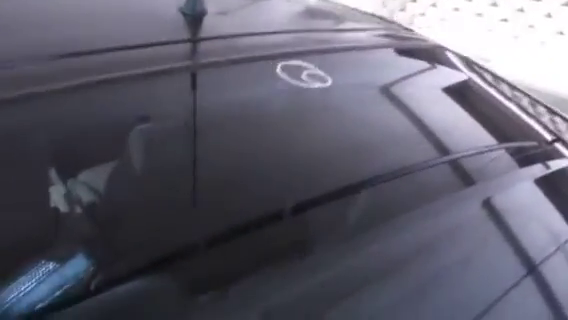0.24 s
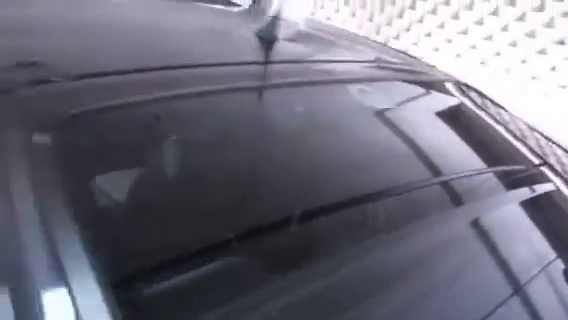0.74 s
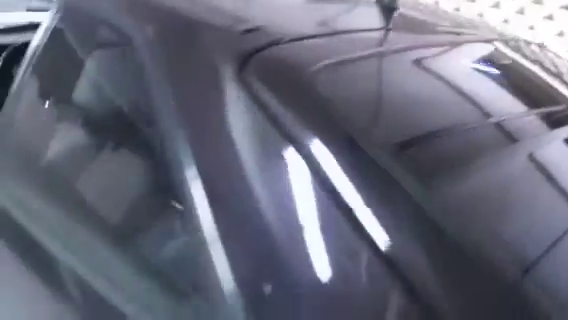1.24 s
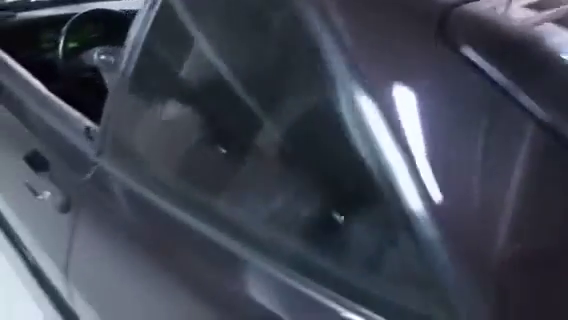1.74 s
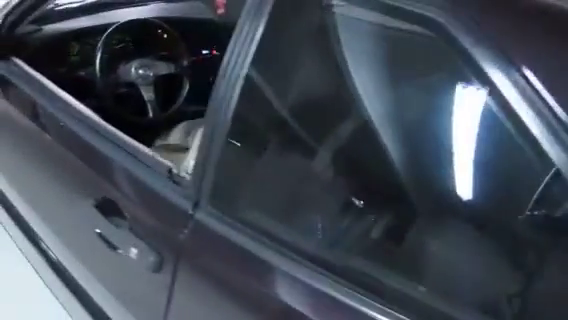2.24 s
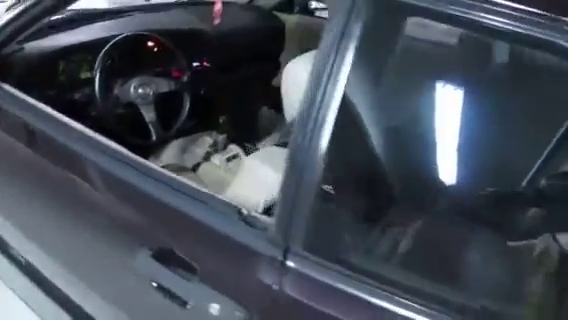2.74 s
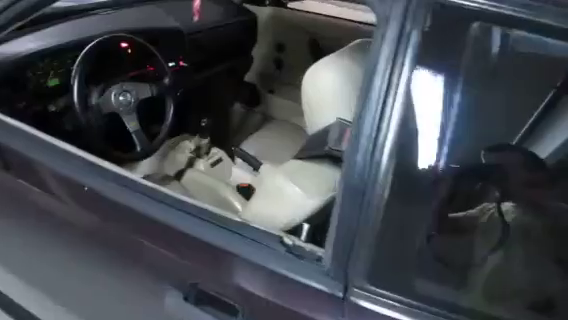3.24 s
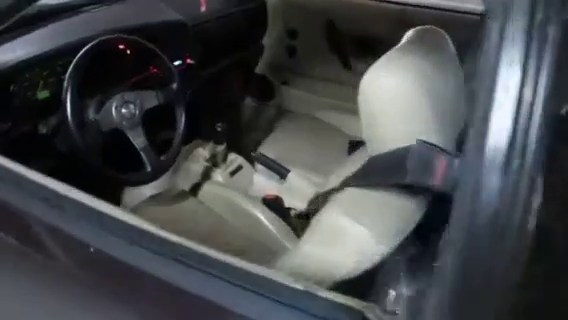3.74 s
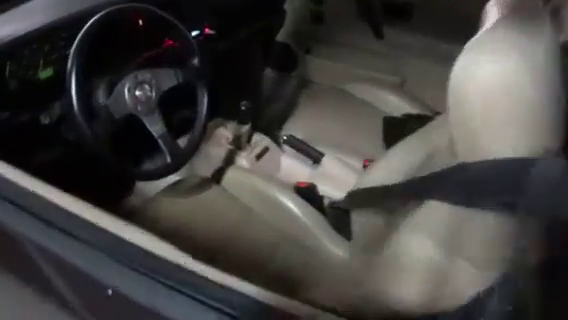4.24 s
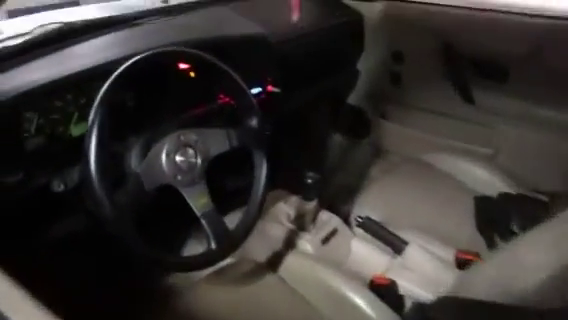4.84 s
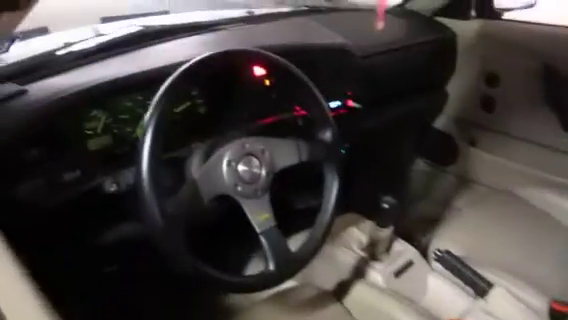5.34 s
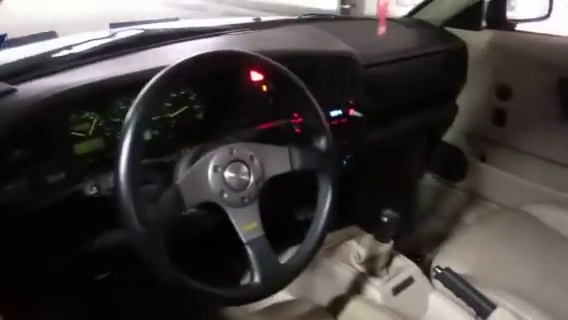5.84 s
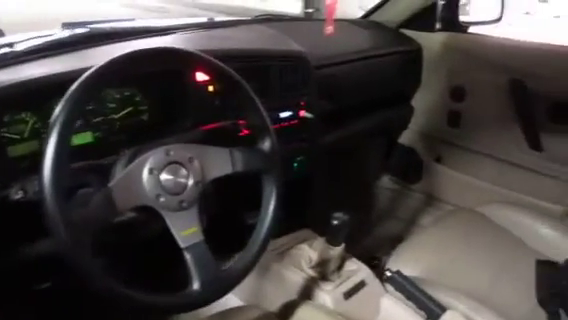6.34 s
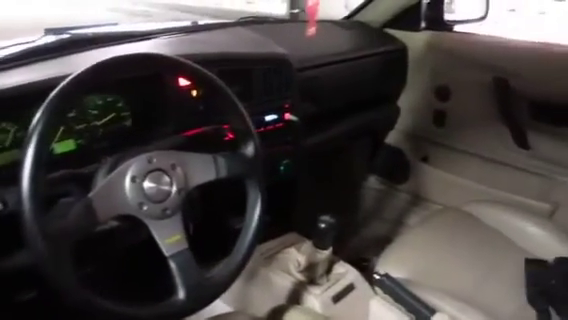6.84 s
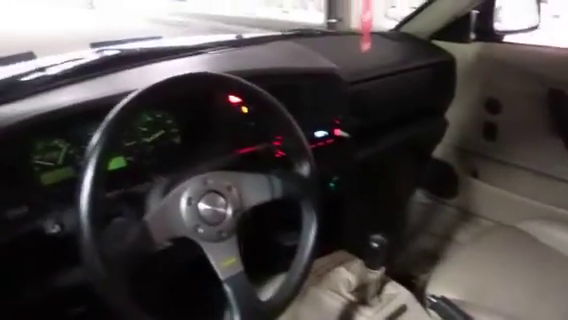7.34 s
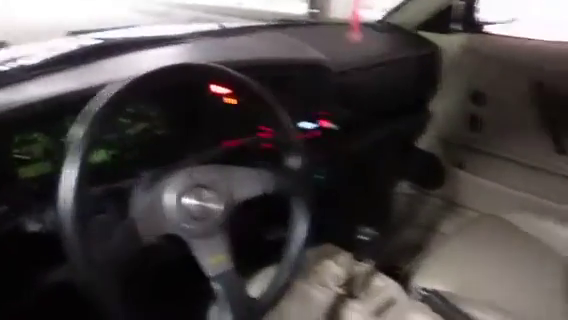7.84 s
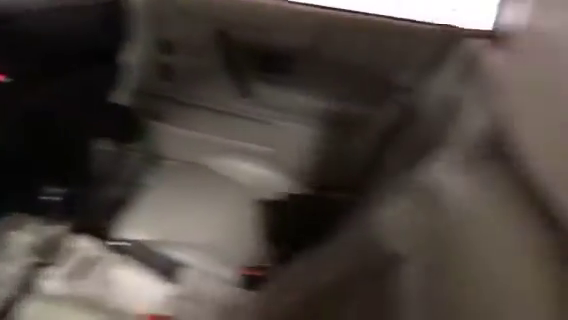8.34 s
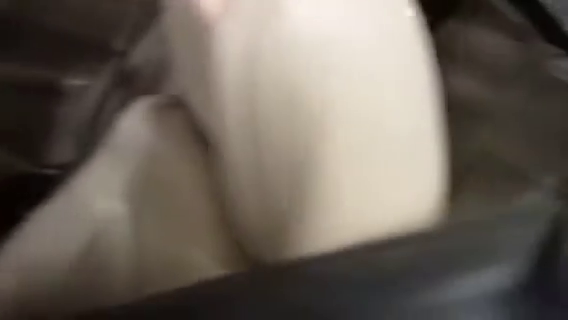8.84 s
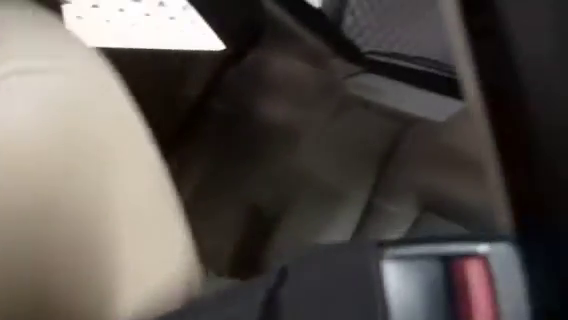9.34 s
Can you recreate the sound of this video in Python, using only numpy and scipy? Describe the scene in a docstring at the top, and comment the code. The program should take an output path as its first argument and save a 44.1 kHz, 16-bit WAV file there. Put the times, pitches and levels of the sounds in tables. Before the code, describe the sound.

A six-cylinder car idles in a parking garage for the whole nine and a half seconds, heard from a handheld microphone moving close beside it. The sports exhaust gives a deep, booming drone with a slight lope; the idle wanders a little but never revs. The boom swells near 0.8, 4.2 and 7 seconds and dips briefly around 0.2, 2.8, 3.8, 5.9, 6.5 and 7.3 seconds, easing at the very end. Underneath are a soft rush of gas, engine hiss, faint valve ticks and low hall rumble. The hiss ducks slightly at strong booms and creeps back. A small click comes at 0.7 seconds, light knocks at about 4.2, 4.9 and 6.2, and a brief handling rustle at 4.6. A very faint thin whine appears from 6.3 to 6.9 seconds as the idle sags.

```python
"""A sports exhaust booms in a parking garage: a six-cylinder car idling near 850 rpm. The pipe sounds the
second and third firing harmonics; unequal cylinders add a lope. Idle hunts and lope beats dip the boom.
Gas rush, hiss and valve ticks fill the hall, with a few knocks and one thin whine as the revs sag.
A handheld camera moves, with one rustle, from the rear window to the open driver's window. Its gain
control ducks at strong booms and creeps back, so the hiss rises and falls in a sawtooth."""
import sys
import numpy as np
from scipy import signal
from scipy.fft import rfft, irfft, next_fast_len
from scipy.io import wavfile
from scipy.ndimage import uniform_filter1d, map_coordinates

SR = 44100
rng = np.random.default_rng(int(sys.argv[2]) if len(sys.argv) > 2 else 0)


def dump_mix(stems):
    """Bounce the given channels to the path in sys.argv[1] as a 16-bit WAV at rate SR."""
    frames = np.atleast_2d(stems).T  # one column per channel
    limited = np.clip(frames, -1, 1)  # hard clip at full scale
    pcm = np.round(limited * 32767).astype(np.int16)
    wavfile.write(sys.argv[1], SR, pcm)


N = 422478
TIME_S = np.arange(N) / SR
CYLINDERS = 6

# Table levels are relative: trims and gain control follow.
# idle drift: t/s, firing rate/Hz
FIRING_RATE = [(0, 41.8), (.71, 41.97), (1.01, 43.3), (1.62, 43.3), (2.31, 41.68), (3.82, 41.78),
               (4.85, 42.68), (5.76, 41.7), (6.52, 40.3), (6.88, 42.63), (7.47, 41.8), (8.2, 43.8),
               (8.9, 43.16), (9.58, 41.5)]
# brief boom dips, from idle hunts or the lope's beats: t/s, length/s, rate change/Hz, boom change/dB
BOOM_DIPS = [(.18, 0.3, -.4, -12), (.96, 0.085, .8, -5.5), (2.47, .2, -.3, -8), (2.83, 0.15, -.8, -11.5),
             (3.211, .13, -1, -3.5), (3.677, .1, -.1, -9.5), (3.808, .14, -.3, -10.5),
             (3.973, 0.08, 0, -9.5), (4.461, .14, 1.1, -2.5), (5.899, .2, -.6, -14.5),
             (6.481, 0.074, -.2, -19), (6.64, .13, -1, -4), (7.34, .24, -1, -15), (7.49, .18, 1, -5.5),
             (8.2, 0.22, .1, -5), (9.433, .17, -.5, -8)]
# throb, 1 x firing rate: t/s, level/dB
THROB_LEVEL = [(0, -39), (1, -33), (3.3, -47), (5.8, -38.5), (6.68, -26), (7.2, -32.5), (9.58, -34.5)]
# boom, 2 x firing rate, along the microphone's path through standing waves: t/s, level/dB
BOOM_LEVEL = [(0, -6), (.62, -7), (.8, -2.5), (1.22, -8.5), (2.13, -6), (2.38, -6.5), (3.05, -9.5),
              (4.06, -11.5), (4.2, -4), (4.6, -5), (5.54, -8.5), (6.92, -10.5), (7.04, -4), (7.9, -6),
              (8.5, -8.5), (9, -7), (9.58, -17)]
# lope of unequal cylinders, 2.5 x firing rate: t/s, level/dB
LOPE_LEVEL = [(0, -23), (1.55, -39), (2.4, -21), (3.35, -29), (3.9, -21), (4.4, -34.5), (5.05, -23.5),
              (6.1, -33), (6.65, -25.5), (8.3, -43), (9, -33.5), (9.58, -20)]
# drone, 3 x firing rate, along the path: t/s, level/dB
DRONE_LEVEL = [(0, -23), (1.13, -13.5), (1.68, -14.6), (2.67, -21.5), (4.73, -18.5), (5.05, -21),
               (6.07, -16), (6.78, -19), (8.9, -18), (9.58, -17)]
# drone nodes crossed by the microphone: t/s, length/s, level change/dB
DRONE_NODES = [(0.155, 0.13, -11), (1.976, .18, -13), (2.25, 0.27, -12.5), (2.63, 0.22, -11),
               (4.39, 0.085, -7), (6.473, 0.063, -7.5), (6.615, .13, -10), (7.18, .11, -7),
               (9.192, .11, -11.5)]
# weaker exhaust tones: multiple of the four-stroke cycle rate, level/dB
CYCLE_ORDERS = [(8, -47.5), (9, -43), (11, -41.5), (13, -25.5), (14, -34), (17, -32.5), (19, -42),
                (21, -50.5), (24, -36), (30, -44), (36, -49), (43, -56), (48, -58)]
# pipe and silencer resonances: f/Hz, width/Hz, level/dB
PIPE_MODES = [(85.6, 41, -1.5), (105.2, 14, -3.5), (126.8, 11, -2.5), (206, 60, -23)]
# broad noise along the path: t/s, gas level/dB, engine bay level/dB
NOISE_LEVELS = [(0, -35.6, -41.5), (.7, -33.5, -39.5), (1.5, -35.5, -41.5), (3.2, -35, -39),
                (4.1, -34.5, -40), (5.2, -33.5, -40), (6.6, -32.4, -39.5), (8, -34.5, -41), (8.9, -32, -40),
                (9.58, -33, -39.5)]
# exhaust gas: f/Hz, spectral level/dB
GAS_SPECTRUM = [(130, -10.5), (170, -4), (240, -3), (300, -6), (400, -6.5), (650, -8.5), (850, -14.5),
                (1200, -20.5), (2000, -45)]
# engine bay: f/Hz, spectral level/dB
BAY_SPECTRUM = [(500, -13.5), (900, -2.5), (1200, 0.5), (1600, -2.5), (2100, 0), (2500, -5.5), (3000, -10),
                (4200, -14), (5200, -13), (6400, -15), (7000, -19.5), (8500, -20.5), (12000, -36),
                (15500, -44)]
# body hum along the path: t/s, level/dB
HUM_LEVEL = [(0, -35.5), (1.5, -43), (2.4, -39), (3.9, -40), (5.4, -51), (6.25, -37), (7.8, -46.5),
             (8.8, -43), (9.58, -34)]
# pumps, pulleys, panels: f/Hz, level/dB
ACCESSORY_TONES = [(251, -52), (277, -56.5), (305, -51), (335, -57), (359, -54), (553, -57.5), (1832, -67)]
# hall rumble: f/Hz, spectral level/dB
HALL_SPECTRUM = [(12, -14.5), (25, 1), (45, 1), (70, -2.5), (150, -10), (220, -13.5)]
# small contacts: t/s, level/dB, f/Hz, width/Hz, burst t60/s
CONTACTS = [(.733, -31.5, 2100, 1200, .03), (4.158, -28, 344.6, 201.5, .08),
            (4.288, -54, 11000, 4000, .008), (4.322, -38, 2900, 1210, .012),
            (4.379, -55, 12000, 4000, .008), (4.864, -26, 1150, 1680, 0.069),
            (6.151, -37, 3500, 3000, .045), (6.15, -28, 930, 120, 0.039)]


def undb(db):
    """Decibels to gain."""
    return 10 ** (np.asarray(db) / 20)


def unit_rms(x):
    """Scale to rms 1."""
    return x / np.sqrt(np.mean(x ** 2))


def curves(table):
    """Each value column, interpolated over time."""
    times_s, *columns = np.transpose(table)
    return [np.interp(TIME_S, times_s, column) for column in columns]


def bell(centre_s, length_s):
    """Gaussian bump, height 1."""
    return np.exp(-(2 * (TIME_S - centre_s) / length_s) ** 2)


def sway(rate_hz):
    """Smooth random curve, rms 1."""
    return unit_rms(map_coordinates(rng.standard_normal(2048), [TIME_S * rate_hz], order=3, mode="wrap"))


def tone(turns):
    """Sine of rms 1, random start phase."""
    return np.sqrt(2) * np.sin(2 * np.pi * (turns + rng.random()))


def drifting_tone(hz, drift_hz, rate_hz):
    """Sine whose pitch wanders at random."""
    return tone(np.cumsum(hz + drift_hz * sway(rate_hz)) / SR)


def pulses(turns):
    """One pulse of random size and sign per turn."""
    return np.diff(np.floor(turns), prepend=0) * rng.standard_normal(N)


def resonate(x, hz, width_hz):
    """One resonance applied twice for steep skirts; width is per pass."""
    b, a = signal.iirpeak(hz, hz / width_hz, fs=SR)
    return signal.lfilter(b, a, signal.lfilter(b, a, x + 1e-18))


def colour(x, spectrum):
    """Shape by (f/Hz, level/dB) points; rms 1."""
    hz, db = np.transpose(spectrum)
    size = next_fast_len(N)
    bins_hz = np.maximum(np.arange(size // 2 + 1) * SR / size, 1)
    shape_db = np.interp(np.log(bins_hz), np.log(hz), db, left=-100, right=-100)
    return unit_rms(irfft(rfft(x, size) * undb(shape_db), size)[:N])


def idle(tremble_hz=0.2, tremble_db=0.65):
    """Hunts bend the firing rate; hunts and lope beats dip the boom. Rate and boom tremble slightly."""
    bend_hz = sum(hz * bell(t_s, length_s) for t_s, length_s, hz, _ in BOOM_DIPS)
    dip_db = sum(db * bell(t_s, length_s) for t_s, length_s, _, db in BOOM_DIPS)
    firing_hz = curves(FIRING_RATE)[0] + bend_hz + tremble_hz * sway(rate_hz=12)
    falter_db = dip_db + tremble_db * sway(rate_hz=12)
    return firing_hz, falter_db


def exhaust_tones(firings, falter_db, wobble_db=-28, waver_db=2):
    """Firings give the harmonics; unequal cylinders rock the boom once a cycle and add lines between."""
    throb_trim_db, boom_trim_db, lope_trim_db, drone_trim_db = -1, 0.01, -2, 0.26
    cycles = firings / CYLINDERS
    wobble = undb(wobble_db) * np.cos(2 * np.pi * cycles)
    nodes_db = sum(db * bell(t_s, length_s) for t_s, length_s, db in DRONE_NODES)
    throb = undb(curves(THROB_LEVEL)[0] + throb_trim_db) * tone(firings)
    boom = (undb(curves(BOOM_LEVEL)[0] + falter_db + boom_trim_db) + wobble) * tone(2 * firings)
    lope = undb(curves(LOPE_LEVEL)[0] + lope_trim_db) * tone(2.5 * firings)
    drone = undb(curves(DRONE_LEVEL)[0] + nodes_db + drone_trim_db) * tone(3 * firings)
    weak_lines = sum(undb(db + waver_db * sway(rate_hz=4)) * tone(order * cycles)
                     for order, db in CYCLE_ORDERS)
    return throb + boom + lope + drone + weak_lines


def exhaust_burble(firings, level_db=-27):
    """Burns vary: each one's excess or lack rings the pipe."""
    kicks = pulses(firings)
    ringing = sum(undb(db) * resonate(kicks, hz, width_hz) for hz, width_hz, db in PIPE_MODES)
    return undb(level_db) * unit_rms(ringing)


def gas_rush(firings, puff_depth=0.062, flutter_db=0.75, trim_db=-2.5):
    """Tailpipe turbulence, one puff per firing; shallow, as the hall blurs them."""
    puffs = 1 + puff_depth * np.cos(2 * np.pi * firings)
    flutter = undb(flutter_db * sway(rate_hz=22))
    return undb(trim_db) * colour(puffs * flutter * rng.standard_normal(N), GAS_SPECTRUM)


def engine_bay(firings, tick_db=-19, flutter_db=0.42, trim_db=-0.68):
    """Belts and intake hiss; two valves tick shut per firing."""
    hiss = rng.standard_normal(N) * undb(flutter_db * sway(rate_hz=14))
    ticks = undb(tick_db) * unit_rms(pulses(2 * firings))
    return undb(trim_db) * colour(hiss + ticks, BAY_SPECTRUM)


def reflections(x, echo_db=-22, longest_s=0.02, count=8):
    """Weak echoes off floor and car body ripple the spectrum; level is kept."""
    lags = (rng.uniform(0.1, 1, count) * longest_s * SR).astype(int)
    echoes = sum(np.roll(x, lag) for lag in lags)
    return (x + undb(echo_db) * echoes) / np.sqrt(1 + count * undb(2 * echo_db))


def body_hum():
    """The shaken body hums in a narrow band; level follows microphone position."""
    return undb(curves(HUM_LEVEL)[0]) * drifting_tone(hz=208, drift_hz=4.5, rate_hz=20)


def accessories(waver_db=3):
    """Pumps, pulleys and shaken panels: faint wavering tones."""
    return sum(undb(db + waver_db * sway(rate_hz=5.4)) * drifting_tone(hz, drift_hz=2.8, rate_hz=25)
               for hz, db in ACCESSORY_TONES)


def garage_rumble(level_db=-36.5):
    """Low noise hanging in the concrete hall."""
    return undb(level_db) * colour(rng.standard_normal(N), HALL_SPECTRUM)


def knocks():
    """Each contact is a short noise burst ringing one resonance."""
    out = np.zeros(N)
    for t_s, db, hz, width_hz, t60_s in CONTACTS:
        decay = (TIME_S >= t_s) * undb(-60 * np.abs(TIME_S - t_s) / t60_s)
        burst = decay * rng.standard_normal(N)
        band_makeup = np.sqrt(SR / 2 / width_hz)
        out += undb(db) * band_makeup * resonate(burst, hz, width_hz)
    return out


def handling_rustle(t_s=4.57, length_s=0.14, peak_db=4):
    """Brief rustle as the camera is handled: a gain that swells the noise for a moment."""
    return undb(peak_db * bell(t_s, length_s))


def whine(start_s=6.295, attack_s=0.22, hold_s=0.12, release_s=0.31, level_db=-47.5, spurt_db=6):
    """Thin rough tone in spurts, timed to the labouring engine's lowest revs."""
    corners_s = start_s + np.cumsum([0, attack_s, hold_s, release_s])
    envelope = np.interp(TIME_S, corners_s, [0, 1, 1, 0])
    spurts = undb(level_db + spurt_db * sway(rate_hz=22))
    return envelope * spurts * drifting_tone(hz=1188, drift_hz=17, rate_hz=110)


def gain_control(x, limit_db=-9, recovery_db_per_s=1.8, start_cut_db=4.3, window_s=0.058, lag_s=0.018):
    """Gain drops fast above the limit, then creeps back at a steady rate."""
    size = int(window_s * SR)
    power = uniform_filter1d(uniform_filter1d(x ** 2, size), size)
    excess_db = 10 * np.log10(power + 1e-12) - limit_db
    recovered_db = recovery_db_per_s * TIME_S
    held_db = np.maximum.accumulate(np.maximum(excess_db + recovered_db, start_cut_db), axis=-1)
    cut_db = np.maximum(held_db - recovered_db, 0)
    pole = np.exp(-1 / (lag_s * SR))
    smooth_cut_db = start_cut_db + signal.lfilter([1 - pole], [1, -pole], cut_db - start_cut_db)
    return x * undb(-smooth_cut_db)


def scene():
    """One crankshaft times exhaust and valves; tones, knocks and rumble join. Mono."""
    firing_hz, falter_db = idle()
    firings = np.cumsum(firing_hz) / SR
    exhaust = exhaust_tones(firings, falter_db) + exhaust_burble(firings)
    gas_db, bay_db = curves(NOISE_LEVELS)
    gas = undb(gas_db) * reflections(gas_rush(firings))
    bay = undb(bay_db) * reflections(engine_bay(firings))
    tones = body_hum() + accessories() + whine()
    return (exhaust + handling_rustle() * (gas + bay) + tones + knocks() + garage_rumble())[None]


def record(dry):
    """Camera: gain control, then a steep treble cut."""
    lowpass = signal.ellip(8, 0.2, 70, 15300, fs=SR, output="sos")
    return signal.sosfilt(lowpass, gain_control(dry))


dry = scene()
out = record(dry)
dump_mix(out)
```